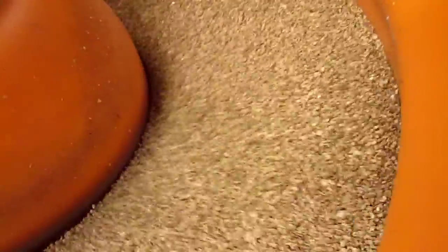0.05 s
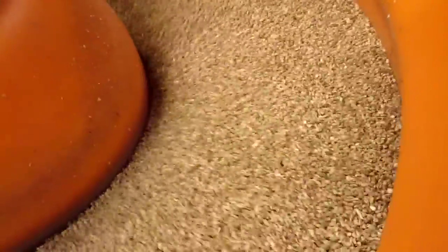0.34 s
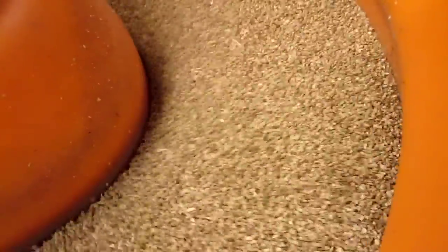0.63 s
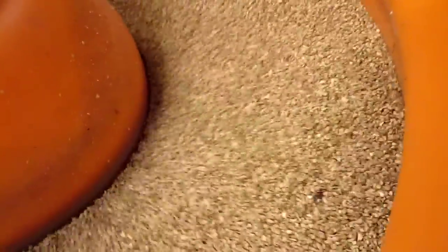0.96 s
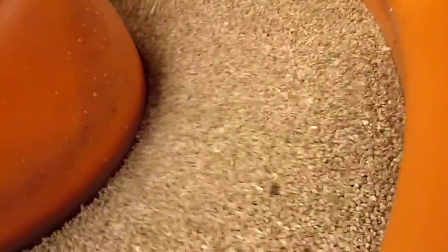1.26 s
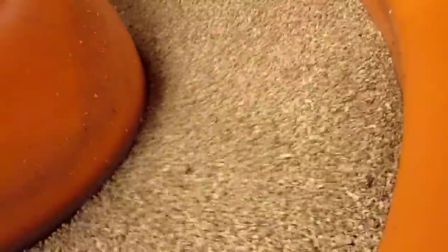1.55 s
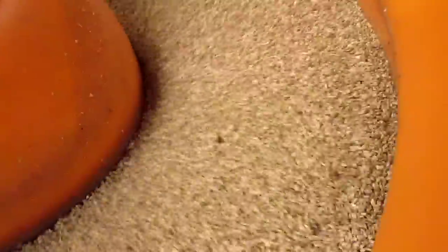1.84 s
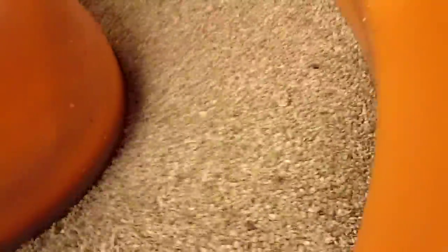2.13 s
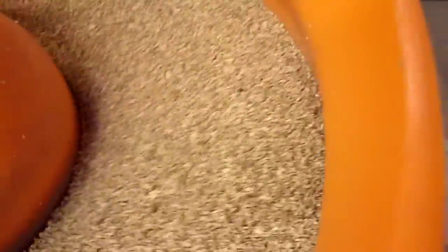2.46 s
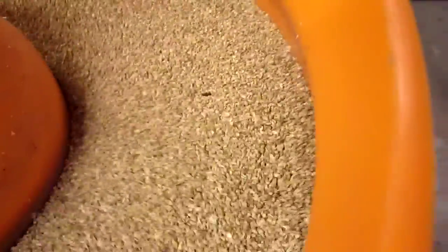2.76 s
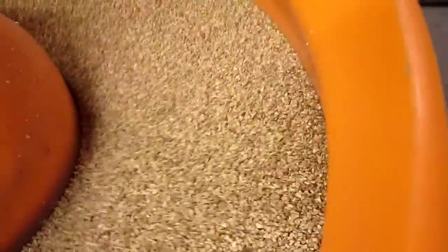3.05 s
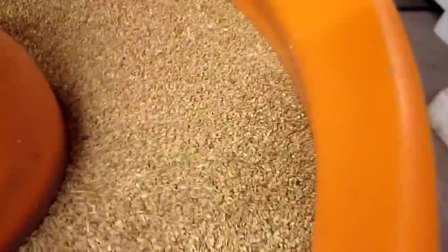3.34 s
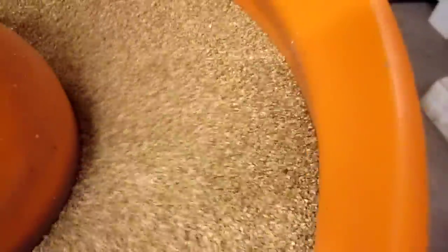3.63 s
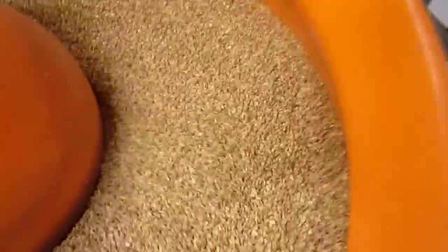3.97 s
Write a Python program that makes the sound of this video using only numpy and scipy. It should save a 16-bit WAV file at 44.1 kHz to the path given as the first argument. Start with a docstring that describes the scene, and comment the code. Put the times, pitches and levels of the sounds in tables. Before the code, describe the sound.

Steady, throbbing motor hum of a vibrating tumbler, with grains hissing in the open bowl.

```python
"""A thick, beating hum comes first: a vibratory case tumbler indoors, heard just above its open bowl.
An unbalanced motor shakes the plastic bowl, which also bounces at its own rate; the two and the mains
mix into the hum. The bowl chatters twice a turn, the fine grit in it hisses in time with the bounce,
and the load churns dully underneath. The sound skips once, with a click."""
import sys
import numpy as np
from scipy import signal
from scipy.fft import rfft, irfft
from scipy.io import wavfile
from scipy.ndimage import uniform_filter1d

SR = 44100
rng = np.random.default_rng(int(sys.argv[2]) if len(sys.argv) > 2 else 0)


def dump(signal):
    """Clip the signal to [-1, 1] and save it as 16-bit WAV at the path in sys.argv[1]."""
    limited = np.clip(np.atleast_2d(signal).T, -1, 1)
    pcm = np.round(limited * 32767).astype(np.int16)
    wavfile.write(sys.argv[1], SR, pcm)


N = 176400

MOTOR_HZ, BOUNCE_HZ, MAINS_BUZZ_HZ = 57.645, 144.48, 120
THROB_HZ, THROB_TOP_S = MAINS_BUZZ_HZ - 2 * MOTOR_HZ, 3.05  # the mains beating against the motor

# The hum's partials. Each row: multiples of the motor, bounce and mains buzz rates (rounded, then
# summed for the pitch), base level in dB, sway with the slow beat in dB.
HUM_PARTIALS = [(1, 0, 0, -29.5, .7), (-1, 1, 0, -51, 1.7), (2, 0, 0, -49, 0), (0, 0, 1, -43.5, 0.5),
                (0, 1, 0, -29, 0), (3, 0, 0, -43, 4.5), (1, 0, 1, -36.5, 0.5), (1, 1, 0, -42.5, -2.3),
                (4, 0, 0, -41.5, -5), (2, 0, 1, -44, 2.4), (0, 0.5, 2, -48.5, 0), (2, 1, 0, -37.5, 1),
                (0, 1, 1, -41, -1.5), (0, 2, 0, -29.4, 2.5), (3, 0, 1, -47, 1.5), (1, 0, 2, -47, 1),
                (3, 1, 0, -40, 2), (1, 1, 1, -36.5, 0), (1, 2, 0, -30.5, -4), (4, 0, 1, -42, 3.5),
                (4, 1, 0, -44.5, -6), (0, 1, 2, -43.5, 0), (7, 0, 0, -41, -5.5), (5, 0, 1, -44.5, 3.8),
                (0, 3, 0, -41, 1), (8, 0, 0, -38, 0.5), (6, 1.5, 0, -45.5, 0.5), (9, 0, 0, -42.5, 1.5),
                (4, 2, 0, -43, -1.5), (7, 1, 0, -47, 0.5), (10, 0, 0, -47.5, 2), (8, 1, 0, -47.5, 0),
                (11, 0, 0, -45.5, 0.3), (9, 1, 0, -49.5, 2.5), (10, 1, 0, -49.5, 0.5), (13, 0, 0, -48.5, 0),
                (15, 0, 0, -49, 1.5), (13, 1, 0, -49, -1), (16, 0, 0, -46, -0.5), (18, 0, 0, -50.5, 3.5),
                (21, 0, 0, -52, 2), (24, 0, 0, -58.5, 0.5)]
# The knocks in one motor turn. Each row: place in the turn from 0 to 1, relative level in dB,
# push from the bounce in dB.
TURN_KNOCKS = [(.44, -1.5, 3), (.85, -0.5, 1.2)]
# The ring of the plastic bowl. Each row: pitch in Hz, bandwidth in Hz, relative level in dB.
BOWL_MODES = [(443.4, 78, 0), (576.5, 72, 1.5), (659, 65, -0.5), (754, 72, 0.5), (881, 76, 2),
              (1066, 76, -4), (1183, 60, -4), (1367, 65, -6), (1596, 160, -12.5)]
# The bright tone of the grit. Each row: frequency in Hz, gain in dB.
GRIT_EQ = [(500, -11), (1000, -3.5), (1700, -2), (2150, -4), (3000, -1), (3600, -1.6), (4180, 1),
           (4800, -3), (5570, -6.5), (6060, -13), (6520, -33.5), (7000, -50.5)]
# The dark tone of the churning load. Each row: frequency in Hz, gain in dB.
RUMBLE_EQ = [(20, -15), (60, -11.5), (100, -15.5), (160, -5.5), (230, -4), (320, 0.5), (420, -0.5),
             (550, -7.5), (800, -5), (1200, -11), (2500, -39.5)]
# The surges of the load. Each row: time in seconds before the skip is cut, fader on the hiss in dB.
HISS_FADER = [(0, -36), (.8, -36.5), (1.38, -37.8), (1.53, -35.5), (1.7, -36.5), (1.87, -35.5), (2.15, -37),
              (2.65, -36.8), (3, -35.5), (3.5, -36.5), (4, -38)]


def undb(db):
    """Decibels to gain."""
    return 10 ** (np.asarray(db) / 20)


def level(x, db):
    """Set the rms level."""
    return x * undb(db) / np.sqrt(np.mean(x ** 2))


def colour(x, points):
    """EQ with a curve of (Hz, dB) points."""
    hz, db = np.array(points, float).T
    bins_hz = np.maximum(np.fft.rfftfreq(len(x), 1 / SR), 1)
    return irfft(rfft(x) * undb(np.interp(np.log(bins_hz), np.log(hz), db)), len(x))


def lowpass(x, hz):
    """A steep treble cut."""
    return signal.sosfilt(signal.ellip(10, .2, 80, hz, fs=SR, output="sos"), x)


def drift(t, hz):
    """A smooth random wander with a spread near 1."""
    steps = rng.standard_normal(int(t[-1] * hz) + 2)
    return 1.17 * uniform_filter1d(np.interp(t * hz, np.arange(len(steps)), steps), int(SR / hz / 2))


def cycle(t, hz):
    """A cosine that peaks at t = 0."""
    return np.cos(2 * np.pi * hz * t)


def hum(t, surge_db):
    """Motor, bounce and mains mix into clean sum and difference tones; the higher ones waver more."""
    sway = cycle(t - .55, hz=.73)  # slow beat between motor and bounce
    tones = 0
    for motor, bounce, mains, db, sway_db in HUM_PARTIALS:
        hz = round(motor) * MOTOR_HZ + round(bounce) * BOUNCE_HZ + round(mains) * MAINS_BUZZ_HZ
        looseness = hz / (2 * BOUNCE_HZ)
        swell_db = .45 * min(looseness, 1) * surge_db + 1.02 * looseness * drift(t, hz=9)
        cycles = hz * (t - .0147) + .23 * rng.standard_normal()  # the partials crest roughly together
        phase = 2 * np.pi * cycles + .093 * looseness * drift(t, hz=12)
        tones -= undb(db + sway_db * sway + swell_db) * np.cos(phase)
    return np.sqrt(2) * undb(.52) * tones


def chatter(t, jitter_s=.00005, rattle_decay_s=.003):
    """Two knocks a turn, pushed by bounce and mains; each sets off a short rattle in the bowl."""
    blows = np.zeros(len(t))
    turns = np.arange(int(t[-1] * MOTOR_HZ))
    for place, db, push_db in TURN_KNOCKS:
        late, scatter = rng.standard_normal((len(turns), 2)).T
        hit_s = (turns + place) / MOTOR_HZ + jitter_s * late
        throb = cycle(hit_s - THROB_TOP_S, THROB_HZ)
        hit_db = db + push_db * cycle(hit_s, BOUNCE_HZ) + .8 * throb + 1.23 * scatter
        blows[np.clip((hit_s * SR).astype(int), 0, len(t) - 1)] += undb(hit_db)
    envelope = signal.lfilter([1], [1, -np.exp(-1 / (rattle_decay_s * SR))], blows)
    rattle = envelope * rng.standard_normal(len(t))
    return level(bowl(blows), db=-35.5) + level(bowl(rattle), db=-36)


def bowl(x):
    """The plastic bowl's damped resonances give each hit a hollow ring."""
    s = 1j * np.fft.rfftfreq(len(x), 1 / SR)
    body = sum((-1) ** k * undb(db) * width * s / (s * s + width * s + hz * hz)
               for k, (hz, width, db) in enumerate(BOWL_MODES))
    return irfft(rfft(x) * body, len(x))


def rumble(t):
    """The dull churn of the load as it rolls over."""
    return level(colour(rng.standard_normal(len(t)), RUMBLE_EQ), db=-37)


def grit(t, hiss_db, grains_per_s=18000):
    """Thousands of tiny grain clicks blur into a hiss, loudest each time the load lands."""
    clicks = (rng.random(len(t)) < grains_per_s / SR) * rng.standard_normal(len(t))
    clicks *= undb(rng.exponential(size=len(t)))  # a few grains stick out
    bounce, motor = cycle(t, BOUNCE_HZ), cycle(t, MOTOR_HZ)
    landing_db = 2 * bounce + 1.2 * motor + bounce * motor
    hiss = colour(clicks * undb(landing_db), GRIT_EQ)
    throb = cycle(t - THROB_TOP_S, THROB_HZ)
    return level(hiss, db=.58) * undb(hiss_db + .5 * throb)


def room(x, t60_s=.25, wet_db=-11):
    """The walls of a small room add a short tail."""
    age = np.arange(SR // 2) / SR
    tail = rng.standard_normal(len(age)) * np.exp(-np.log(1000) * age / t60_s)
    return x + undb(wet_db) * signal.fftconvolve(x, tail / np.linalg.norm(tail))[:len(x)]


def skip(x, at_s, samples, click_db):
    """The sound jumps forward by a sliver, with a click on the join."""
    start = int(at_s * SR)
    joined = np.delete(x, slice(start, start + samples))
    joined[start] += undb(click_db)
    return joined


def scene():
    """The tumbler's layers swell together as its load surges; the top is dulled and it skips once."""
    skipped = int(.0232 * SR)
    t = np.arange(N + skipped) / SR
    hiss_db = np.interp(t, *np.array(HISS_FADER).T)
    surge_db = hiss_db - hiss_db.mean()
    load = (chatter(t) + rumble(t)) * undb(1.1 * surge_db) + grit(t, hiss_db)
    tumbler = lowpass(hum(t, surge_db) + room(load), hz=6550)  # a narrow-band microphone
    return skip(tumbler, at_s=1.387, samples=skipped, click_db=-16)[None]


def record(dry):
    """Shave the highest treble off the mix."""
    return lowpass(dry, hz=16000)


dry = scene()
out = record(dry)
dump(out)
```